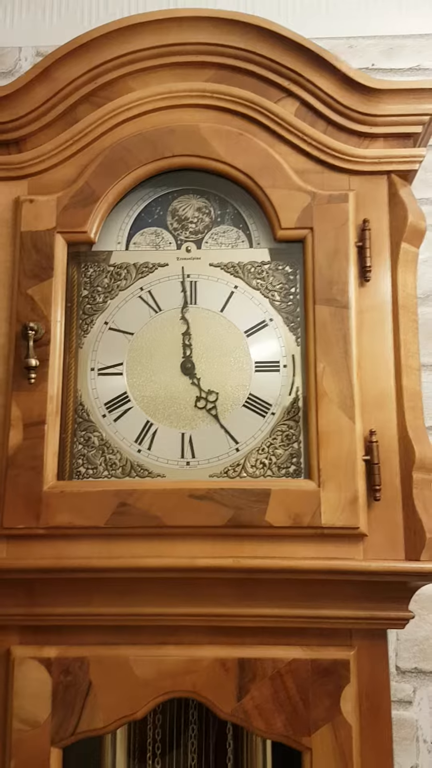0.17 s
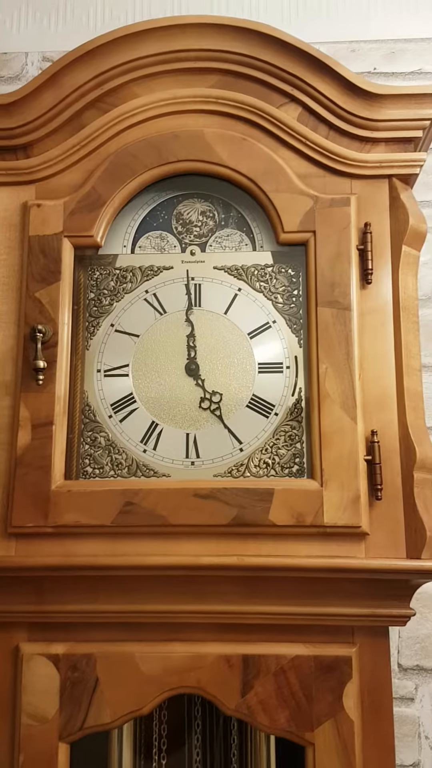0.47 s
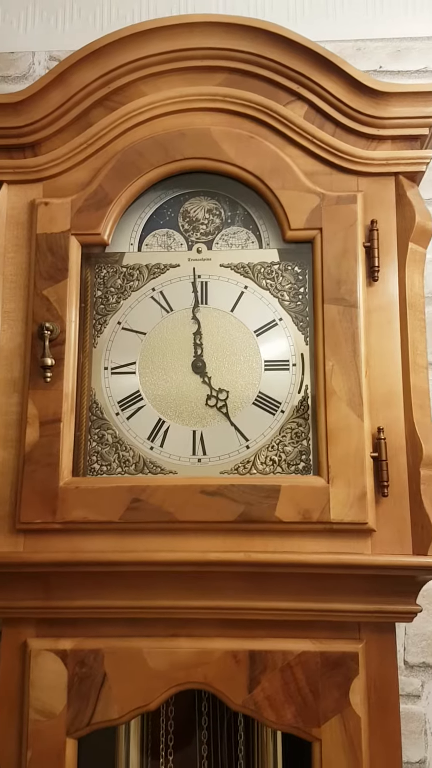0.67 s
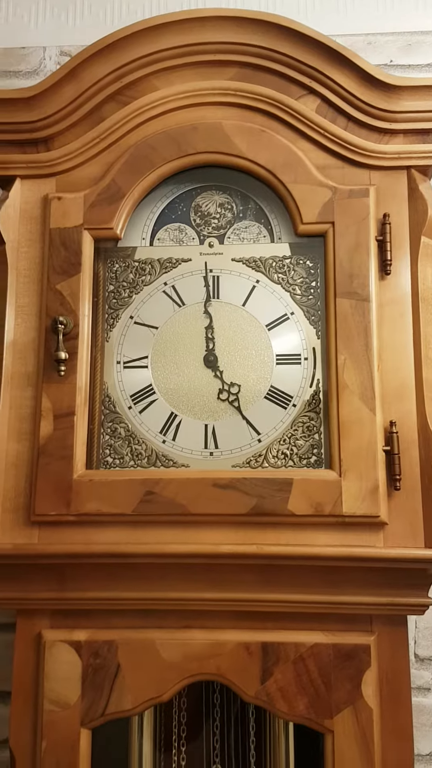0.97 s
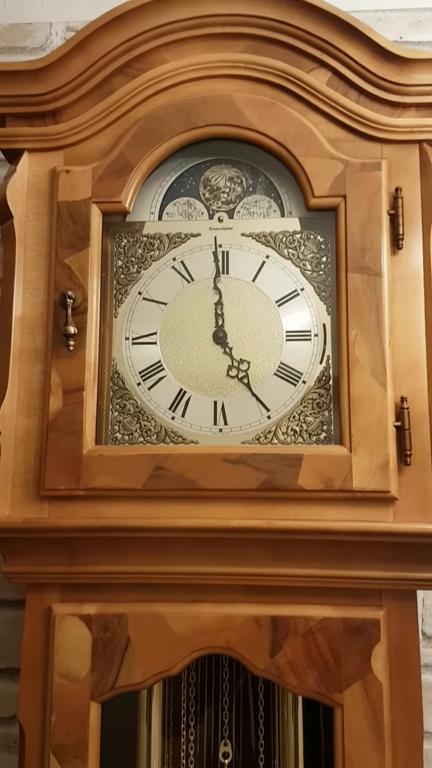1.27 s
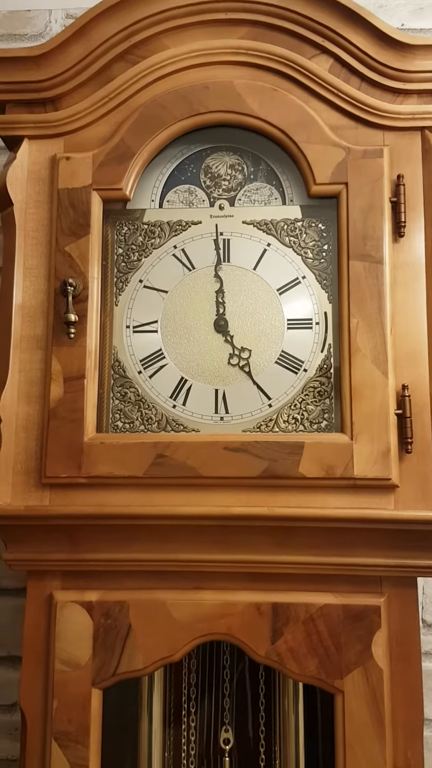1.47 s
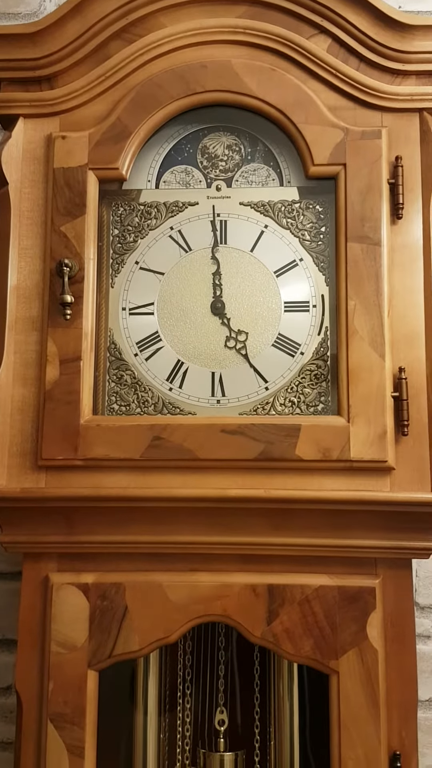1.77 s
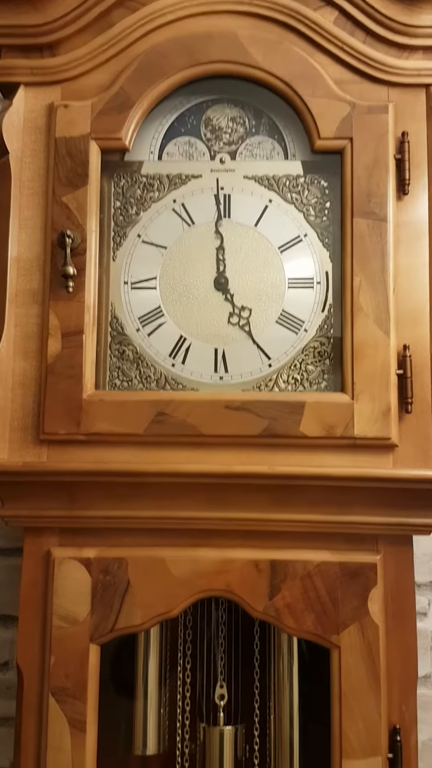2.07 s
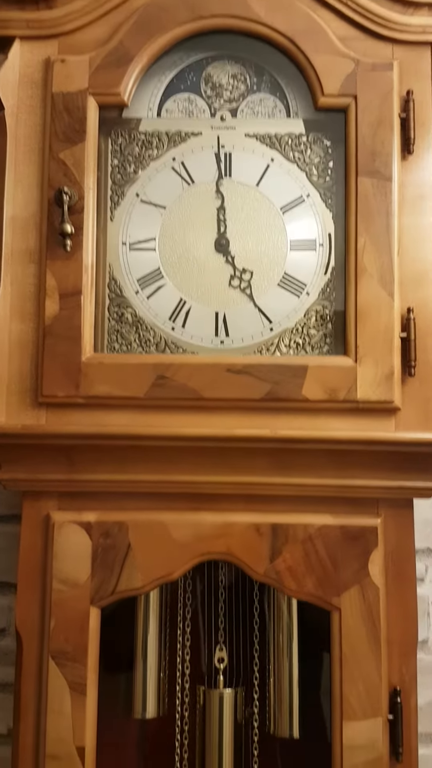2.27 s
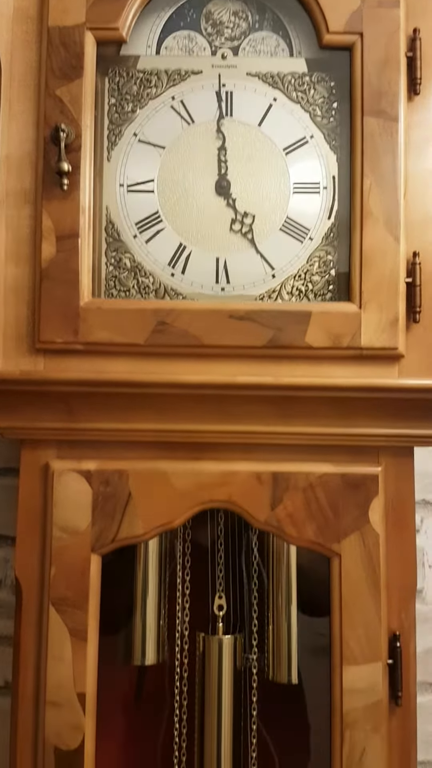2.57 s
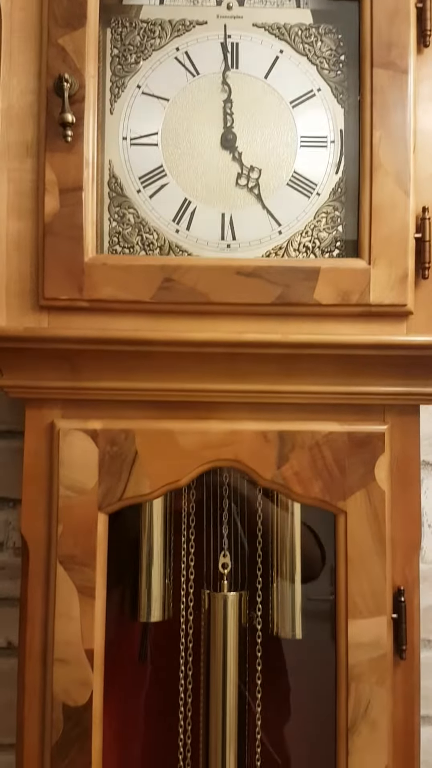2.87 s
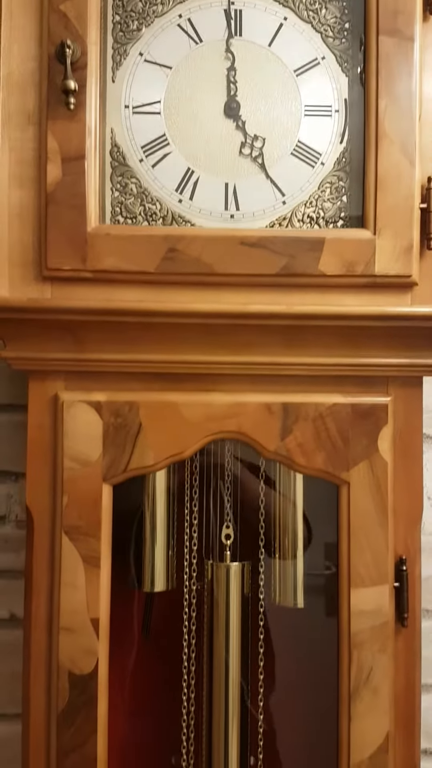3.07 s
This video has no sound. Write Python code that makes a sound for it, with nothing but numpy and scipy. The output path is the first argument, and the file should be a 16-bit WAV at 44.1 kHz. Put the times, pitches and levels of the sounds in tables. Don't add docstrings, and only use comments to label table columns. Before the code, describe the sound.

A pendulum clock ticks faintly and unevenly across a quiet room, its wooden case ringing softly; two hard finger knocks on the right of a handheld stereo microphone open it, over hiss and low hum.

```python
import sys
import numpy as np
from scipy import signal
from scipy.fft import rfft, irfft, next_fast_len
from scipy.io import wavfile
from scipy.ndimage import map_coordinates

SR = 44100
rng = np.random.default_rng(int(sys.argv[2]) if len(sys.argv) > 2 else 0)


def wav_out(sig):
    wavfile.write(sys.argv[1], SR, np.round(np.clip(np.atleast_2d(sig).T, -1, 1) * 32767).astype(np.int16))


def level_to_linear(level):
    exponent = np.asarray(level, float) / 20
    return 10 ** exponent


N = 142002

# f/Hz, level/dB
AIR_SPECTRUM = [(25, -28), (100, -12.5), (300, -14.5), (640, -21), (1260, -22), (2500, -27), (5000, -35),
                (8000, -48)]
SELF_SPECTRUM = [(500, -14), (3000, -6.5), (8500, -4), (11000, -3), (14500, 5.5), (15700, 2)]
# f/Hz, correlation
AIR_LIKENESS = [(60, 0.27), (290, 0.34), (640, 0.38), (1400, .01)]
# f/Hz, rms level/dB
MOTOR_HUM = [(48.4, -68), (96.9, -68), (145.3, -74.5), (242.2, -77), (635, -82.5), (1228, -88)]
MAINS_HUM = [(100, -76), (290, -81.5)]

# t/s, level/dB
TALL_BEATS = [
    (.515, -61.5),
    (1.292, -56),
    (2.339, -55.5),
    (3.11, -58.5),
]
WALL_BEATS = [
    (.303, -60.5),
    (.815, -63.5),
    (1.475, -60.5),
    (1.997, -63),
    (2.654, -61.5),
    (3.174, -62),
]
SMALL_BEATS = [
    (.245, -65),
    (.52, -66),
    (1.024, -65.5),
    (1.6, -60.5),
    (1.7, -67.5),
    (2.385, -58),
    (2.45, -76),
    (2.968, -65.5),
    (3.02, -63),
]
# t/s, level/dB
ROD_SHIVERS = [
    (.18, -66.5),
    (.72, -75),
    (1.62, -76),
    (2.262, -77),
    (2.312, -66.5),
    (2.58, -69),
]
# f/Hz, width/Hz, level/dB
TALL_CASE = [(888, 26, 0.5), (1396, 80, -8), (2140, 76, 3.5), (2435, 243, -5), (3370, 160, -12),
             (5940, 1800, -26.5)]
WALL_CASE = [(897, 64, 3.5), (1980, 230, 1.5), (2590, 840, -4.5), (3735, 300, -7), (5940, 5800, -26)]
SMALL_CASE = [(1541, 13, 0)]
ROD_MODE = [(1234, 10, 0)]

# f/Hz, level/dB
CAVITY_SPECTRUM = [(600, -42.5), (1800, -9.5), (2500, -8.5), (3150, 0), (3900, -9.5), (6000, -10.5),
                   (6700, -12.5), (7600, -39.5)]
# t/s, length/s, level/dB
RUB_STROKES = [
    (.115, .12, -48.5),
    (2.784, 0.1, -61.5),
]
# f/Hz, level/dB
SKIN_SPECTRUM = [(60, -15.5), (200, 3.5), (600, -11), (1500, -23.5), (3000, -41.5)]
# t/s, peak level/dB, f/Hz, direction, thud level/dB
HARD_KNOCKS = [
    (.0696, .5, 830, -1, -23),
    (.1106, -6, 850, -1, -23),
    (.108, -19, 1000, 1, -70),
    (.10975, -15, 2200, -1, -70),
]
TAPS = [
    (.172, -31.5, 1500, 0.84, -38),
    (0.1792, -34, 706, 0.82, -55),
    (0.1837, -31, 590, -1.5, -58),
    (0.21, -22, 516, -0.73, -70),
    (.215, -22.5, 756, -0.55, -52),
    (0.61, -29, 476, -0.98, -58),
    (2.266, -25.5, 580, -1.6, -49),
    (2.8048, -29, 1100, 0.49, -70),
    (2.8749, -37.5, 1710, -1.37, -73),
]
# t/s, peak level/dB
LEFT_LEAK = [
    (.0699, -42),
    (.1109, -38),
]
# t/s, peak level/dB, f/Hz, direction
PUSHES = [(0.131, -32, 210, 0.76), (.14, -36.5, 240, 1), (0.147, -41, 200, 0.59), (.158, -39, 166, 1),
          (.164, -27.5, 186, -0.59), (.189, -35, 107, 0.51), (0.2069, -27, 203, 1), (0.2119, -30.5, 187, 1),
          (2.279, -48, 299, 0.88), (2.332, -44.5, 280, 1), (2.719, -42.5, 228, 0.93),
          (2.8055, -39.5, 260, 1), (2.8347, -33.5, 134, -0.64), (2.874, -38.5, 140, 1)]
REBOUNDS = [
    (.071, -19, 220, -1),
    (.1119, -14, 215, -1),
    (.1285, -34, 300, -1),
]
# t/s, peak level/dB, f/Hz, cycles to -60 dB, direction
SNAPS = [
    (.1104, -26, 13000, 14.5, 0.91),
    (.2101, -33, 1800, 0.5, -1.07),
    (2.176, -37.5, 11400, 3, 0.86),
    (3.1439, -27, 3240, 2.5, 0.79),
    (3.146, -60, 5960, 11, 1),
]
LIFT_SNAPS = [
    (1.7945, -33, 3050, 13, -1),
    (1.7959, -36, 1300, 3, 1),
    (1.798, -31, 2850, 9, -1),
]

START_S, LIFT_S = .066, 1.797
AIR_DB, SELF_DB, CAVITY_DB = -66, -76, -61
SLOW_RISE, SHARP_RISE = .1, .04
TIME = np.arange(N) / SR


def unit(x):
    return x / np.sqrt(np.mean(x ** 2) + 1e-20)


def along(points, hz):
    f, value = np.transpose(points)
    return np.interp(np.log(hz + 1), np.log(f + 1), value)


def wobble(rate):
    knots = rng.standard_normal(int(N * rate / SR) + 4)
    return map_coordinates(knots, [np.arange(N) * rate / SR])


def filtered(x, response):
    m = next_fast_len(N + SR // 2)
    spectrum = rfft(x, m) * response(np.fft.rfftfreq(m, 1 / SR))
    return irfft(spectrum, m)[..., :N]


def shaped_noise(channels, spectrum):
    return unit(filtered(rng.standard_normal((channels, N)), lambda f: level_to_linear(along(spectrum, f))))


def resonances(table):
    def response(f):
        total = 0
        for k, (centre, width, db) in enumerate(table):
            damping = 1j * f * width
            total = total + (-1) ** k * level_to_linear(db) * damping / (centre ** 2 - f * f + damping)
        return total
    return response


def ring(s, db, hz, t60, rise):
    start = int(s * SR)
    t = np.clip(np.arange(start, start + 4000) / SR - s, 0, 1)
    swell = (1 - np.exp(-t * hz / rise)) ** 2
    wave = level_to_linear(db - 60 * t / t60) * swell * np.sin(2 * np.pi * hz * t)
    return np.pad(wave, (start, N))[:N]


def self_noise():
    return level_to_linear(SELF_DB) * shaped_noise(2, SELF_SPECTRUM)


def room_air():
    def mid_side(f):
        turn = np.arccos(np.clip(along(AIR_LIKENESS, f), -1, 1)) / 2
        return level_to_linear(along(AIR_SPECTRUM, f)) * [np.cos(turn), np.sin(turn)]
    mid, side = filtered(rng.standard_normal((2, N)), mid_side)
    return level_to_linear(AIR_DB) * unit(np.array([mid + side, mid - side]))


def hum():
    total = 0
    for hz, db in MOTOR_HUM + MAINS_HUM:
        level = level_to_linear(db + 2 + 1.8 * wobble(3.695))
        phase = 2 * np.pi * hz * TIME + .5 * wobble(2.96) + rng.uniform(0, 6)
        total = total + level * np.sin(phase)
    return total * level_to_linear([[1.5], [-1.5]])


def whine():
    band = unit(filtered(rng.standard_normal((2, N)), resonances([(14433, 60, 0)])))
    return level_to_linear(-91) * band * np.clip(TIME - .28, .3, 1)


def distant_blows(hits, case, rise, t60, direct_db):
    t = np.arange(SR // 2) / SR
    cloud = np.zeros((2, N + SR))
    for s, db in hits:
        start = round(s * SR)
        shape = level_to_linear(db - 60 * t / t60) * (1 - np.exp(-t / rise))
        cloud[:, start:start + len(t)] += shape * rng.standard_normal((2, len(t)))
        cloud[:, start] += level_to_linear(db + direct_db)
    colour = resonances(case)
    gain = np.sqrt(np.mean(abs(colour(np.fft.rfftfreq(8192, 1 / SR))) ** 2))
    return filtered(cloud[:, :N], colour) / gain


def clocks():
    tall = distant_blows(TALL_BEATS, TALL_CASE, .0015, .36, 19)
    wall = distant_blows(WALL_BEATS, WALL_CASE, .001, .25, 17)
    small = distant_blows(SMALL_BEATS, SMALL_CASE, .01, .22, 22)
    rod = distant_blows(ROD_SHIVERS, ROD_MODE, .01, .22, 22)
    return tall + wall + small + rod


def covered_port():
    hiss = shaped_noise(1, CAVITY_SPECTRUM)[0]
    level = level_to_linear(CAVITY_DB + .4 * wobble(3) + .6 * wobble(12))
    return np.array([0 * hiss, level * hiss * (TIME < LIFT_S)])


def rubs():
    grit = shaped_noise(1, SKIN_SPECTRUM)[0] * level_to_linear(4 * wobble(120))
    stroke = 0
    for s, length, db in RUB_STROKES:
        stroke = stroke + level_to_linear(db) * np.sin(np.pi * np.clip((TIME - s) / length, 0, 1))
    return np.array([0 * TIME, grit * stroke])


def taps():
    total = 0
    for s, db, hz, way, thud_db in HARD_KNOCKS + TAPS:
        tap = ring(s, db, hz, 2.8 / hz, SLOW_RISE)
        thud = ring(s + .0012, thud_db, 120, .05, SHARP_RISE)
        total = total + way * (tap + thud)
    click = ring(.06958, -2, 6500, 2 / 6500, SHARP_RISE)
    u = (TIME - .11043) / .000105
    squeeze = level_to_linear(3.2) * u * np.exp(-u * u / 2)
    return total + click + squeeze


def pushes():
    return sum(way * ring(s, db + 4.5, hz, 2.8 / hz, SLOW_RISE) for s, db, hz, way in PUSHES + REBOUNDS)


def snaps():
    crack = (.11032, -17, 4600, 3, -1)
    return sum(way * ring(s, db + 2.5, hz, cycles / hz, SLOW_RISE)
               for s, db, hz, cycles, way in SNAPS + LIFT_SNAPS + [crack])


def fingers():
    left = -sum(ring(s, db, 560, 5 / 560, SLOW_RISE) for s, db in LEFT_LEAK)
    return np.array([left, taps() + pushes() + snaps()])


def scene():
    far = self_noise() + room_air() + hum() + whine() + clocks() + covered_port()
    far = filtered(far, lambda hz: hz < 15720)
    opening = np.clip((TIME - START_S) / .004, 0, 1)
    return (far + rubs() + fingers()) * opening


def band_limit(x):
    return signal.sosfilt(signal.butter(12, 16940, fs=SR, output="sos"), x)


def record(dry):
    corner = 62
    cut = filtered(dry, lambda f: -f * f / (corner ** 2 - f * f + 1.4j * f * corner))
    mix = cut - .0004 * (TIME > START_S)
    return band_limit(mix)


dry = scene()
out = record(dry)
wav_out(out)
```